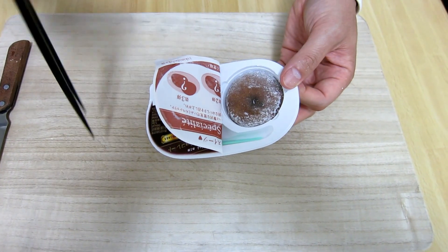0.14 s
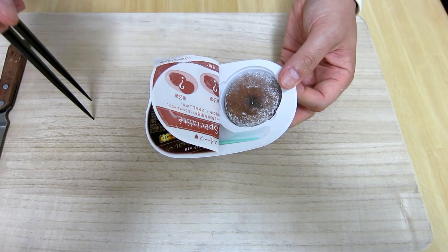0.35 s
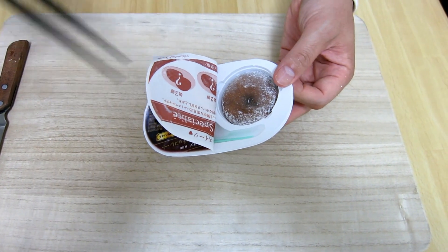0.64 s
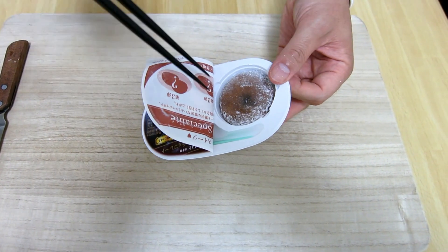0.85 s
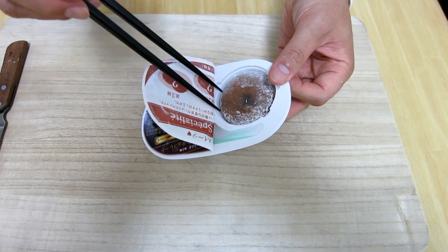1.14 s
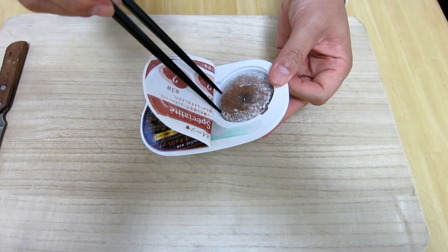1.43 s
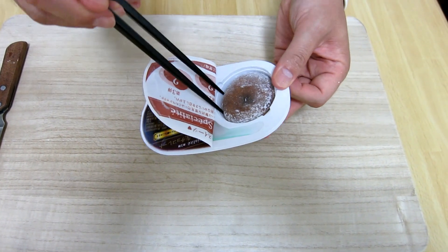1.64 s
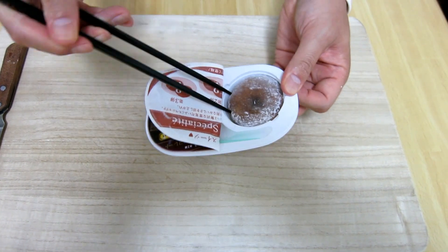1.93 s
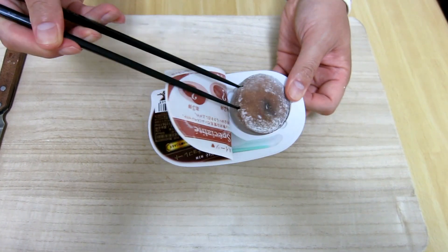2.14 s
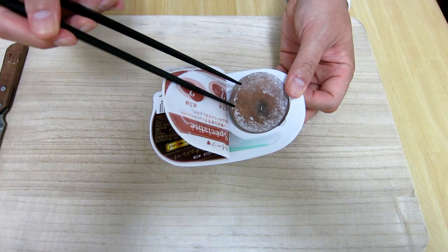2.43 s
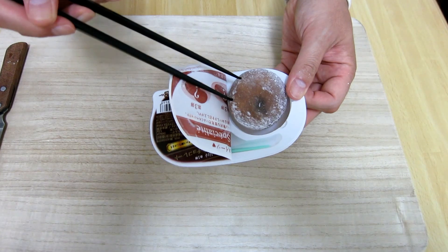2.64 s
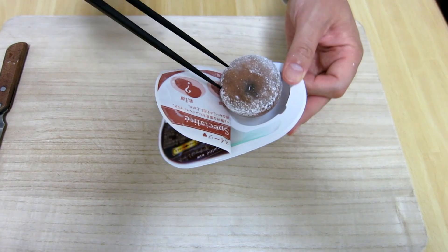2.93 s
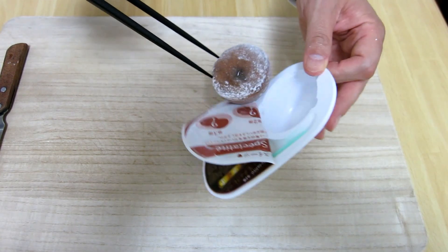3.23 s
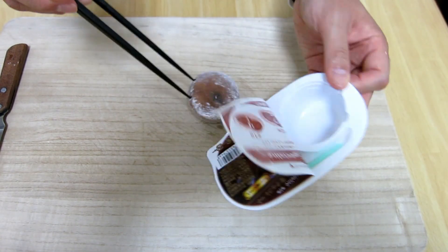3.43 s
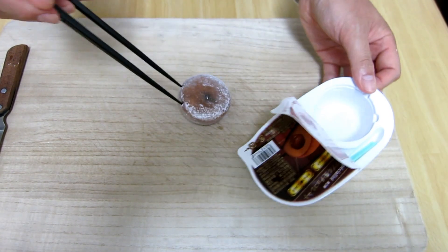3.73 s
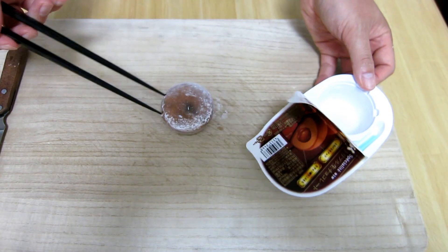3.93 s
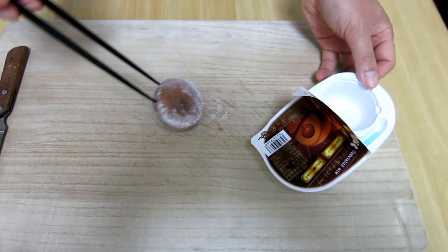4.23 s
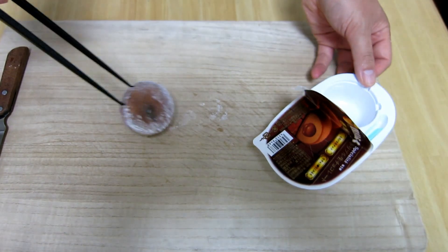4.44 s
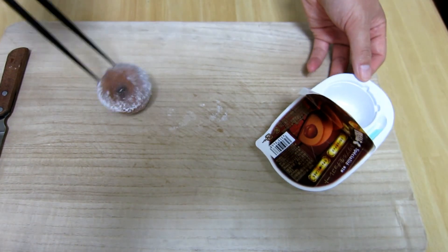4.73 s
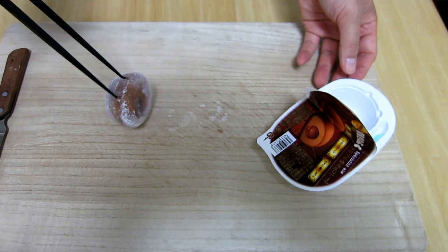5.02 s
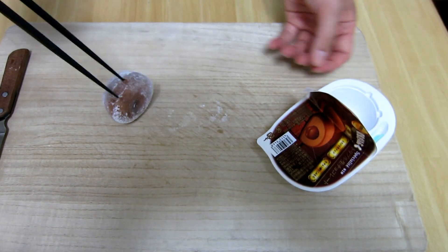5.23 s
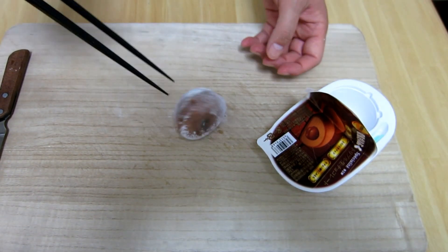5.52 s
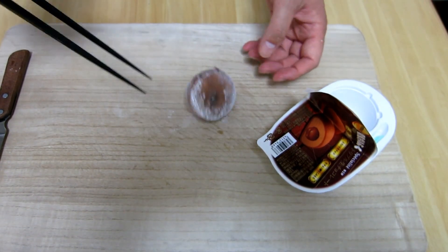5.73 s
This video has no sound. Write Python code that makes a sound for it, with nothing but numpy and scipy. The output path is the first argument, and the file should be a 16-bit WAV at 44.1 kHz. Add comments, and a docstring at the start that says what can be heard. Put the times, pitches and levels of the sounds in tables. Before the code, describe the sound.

Chopsticks clack sharply in a quiet kitchen, thin plastic crackles and pops loudly, then things bump and scrape on a wooden board.

```python
"""Chopsticks clack sharply over the hush of a kitchen, then prise a frozen sweet out of a thin plastic tray.
The sticks are tuned modes with a singing tail; things shoved on a wooden board boom as friction drives its modes.
Blows ring those same modes, scraping is coloured grit, and buckling plastic snaps as noise bursts with tray modes.
Film and tray rustle as clumped random slips. The board's boom reaches a close camera through the table."""
import sys
import numpy as np
from scipy import signal
from scipy.fft import rfft, irfft
from scipy.io import wavfile
from scipy.ndimage import uniform_filter1d

SR = 44100
rng = np.random.default_rng(int(sys.argv[2]) if len(sys.argv) > 2 else 0)


def transcribe(u):
    """Save the signal u as a 16-bit wav file named by the first command-line argument.

    u: samples, shape (n,) or (channels, n), limited to [-1, 1]; the rate is SR.
    q: integer samples, one column per channel.
    """
    v = np.clip(np.atleast_2d(u).T, -1, 1)
    q = np.round(v * 32767).astype(np.int16)
    wavfile.write(sys.argv[1], SR, q)


N = 258411

# room tone spectrum: hz, density_db (per Hz)
HUSH_SPECTRUM = [(15, -41), (25, -29.5), (59, -22.5), (141, -6.5), (190, -25), (344, -19), (405, -4),
                 (624, -16), (796, -12), (988, -12.5), (3080, -9), (3430, -11.5), (8830, -13.5),
                 (12900, -18.5), (16000, -32)]
HUSH_DB = -61
# left-right likeness of the room tone: hz, likeness (0 to 1)
HUSH_LIKENESS = [(100, 0.33), (500, 0.17), (1500, 0.16), (5000, 0.077), (14000, 0.076)]
# distant appliances: centre_hz, width_hz, level_db
APPLIANCES = [(400, 35, -67), (950, 45, -63)]

# modes of the wooden board: hz, level_db, t60_s
BOARD_MODES = [(97.5, 3.5, 0.55), (132.1, 2, 0.36), (136, 1.5, 0.36), (176.5, -4, 0.39), (191.5, 1.5, 0.36),
               (224, 2.5, 0.066), (294, -18.5, 0.12), (314.8, -17, 0.28), (450, -1.5, 0.034),
               (486.5, -31, 0.4), (632, -17.5, 0.11), (809, -25, 0.11), (943, -27.5, 0.176),
               (1464, -23.5, 0.055)]
# hands and things shoved or rocking on the board: start_s, length_s, boom_db, change_db (over the shove),
# centre_hz (of the boom), sway_db (deep table sway above the boom)
SHOVES = [(0, .11, -65, -10, 173, -25), (.415, .1, -33.5, -7.5, 236, -26),
          (.54, 0.13, -38.5, 3.5, 192, -13), (.82, 0.1, -43.5, 2, 155, -16),
          (1.09, 0.13, -37.5, -9.5, 192, -15.5), (1.37, 0.042, -50, 0, 219, -11),
          (1.57, 0.065, -46.5, 0.5, 159, -1.5), (1.77, 0.17, -51.5, -1, 180, -11),
          (2.11, 0.083, -51, 19, 222, -12), (2.2, 0.31, -31, -30, 181, -29), (2.8, .02, -65, 7.5, 198, -25),
          (2.97, 0.21, -47, -15.5, 144, 4), (3.22, .04, -65, -6, 155, 6), (3.385, 0.064, -36, -5, 144, -17),
          (3.57, .13, -32.5, -15.5, 196, -26), (3.72, .2, -40.5, 0, 154, -5.5),
          (4.035, 0.063, -32, -2.5, 171, -20), (4.135, .07, -24.5, 8, 154, -13),
          (4.205, 0.073, -21.5, -5, 145, -21), (4.3, .07, -22, -14, 152, -7),
          (4.38, 0.24, -38.5, -18, 164, 0), (4.72, 0.066, -48.5, 1, 190, -21),
          (4.878, 0.12, -29.5, -6.5, 190, -34), (5.02, .1, -45, -15, 133, -8),
          (5.25, 0.038, -39.5, 11, 151, -12), (5.31, 0.21, -39, -16.5, 151, -11),
          (5.56, .02, -53, -1, 200, -12), (5.64, 0.28, -27.5, -25, 179, -23)]
SHOVE_RISE_DB_PER_S, SHOVE_FALL_DB_PER_S = 605, 205
SHOVE_REST = (-78.5, 197, -26)  # between shoves: boom_db, centre_hz, sway_db
# spectrum of scraped wood: hz, density_db (per Hz)
SCRAPE_SPECTRUM = [(250, 4.5), (400, 0.5), (700, 1.5), (1400, -3.5), (2500, -11.5), (3500, -16),
                   (5000, -22.5), (9000, -38)]
# things scraping over the wood: start_s, length_s, level_db, change_db (over the scrape), brightness_db_per_octave
SCRAPES = [(0, 0.094, -31.5, -13.5, 0.2), (.1, 0.3, -51.5, -13, -2), (.384, 0.19, -41, -16, -2),
           (.8, 0.2, -51.5, 6, 0.9), (1.14, 0.24, -44.5, -8, -2), (1.35, 0.76, -49, 6.5, -0.2),
           (2.1, 0.089, -46, 10, -0.5), (2.2, 0.32, -40, -21, -3), (2.825, 0.025, -49, -7, -0.7),
           (2.93, 0.6, -64.5, 10, -6), (3.52, 0.53, -48.5, -11, -2.5), (3.95, 0.26, -44, -5, -0.2),
           (4.14, .1, -48, 0, -9.3), (4.24, 0.58, -46, -3.5, -1.2), (4.855, 0.044, -26, -2.5, 0.24),
           (4.91, 0.34, -35, -14, -0.25), (5.25, 0.58, -44, -11.5, -0.1), (5.6, 0.3, -42, -16, -1.3)]
SCRAPE_RISE_DB_PER_S, SCRAPE_FALL_DB_PER_S = 1793, 240
SCRAPE_REST = (-53.5, 0.1)  # between scrapes: level_db, brightness_db_per_octave

# chopsticks meeting: start_s, level_db
CLACKS = [(.008, -20), (0.023, -28), (0.0661, -15), (.528, -51)]
# bending modes of the chopsticks: hz, level_db, t60_s
STICK_MODES = [(1020, -6, .035), (1900, -14, .03), (3250, -4, .03), (4920, 2, .035), (5200, -5, .03),
               (6885, -1, .04), (8845, -4, .035), (9146, -5, .035), (11430, -6, .035), (13300, -13, .03)]
AFTER_RING_DB, AFTER_RING_LENGTH = -18, 10.2  # the free sticks sing on, softer and this many times longer

# blows on the board: start_s, level_db, deep_db, upper_db, high_db (shares of the deepest, upper and highest modes),
# ring_length (factor), rap_db (woody rap), tick_db
KNOCKS = [(0.3807, -16, -21, 25, 20.5, 0.45, -28.5, -36), (0.4333, -23, -8, -12, 29, 0.79, -43, -44.5),
          (0.465, -31, -8, -5, 46, 0.66, -55, -61), (2.1652, -5.5, -9, 11, 1.5, 0.58, -17, -46),
          (3.508, -9, -12.5, 13.5, -4, 0.8, -28.5, -41), (4.009, -27.5, 4, 38, 0, 1, -46, -52),
          (4.979, -16, 3.5, 5, -6, 0.79, -44, -29.5), (5.269, -16, -5, -8, -29, 0.94, -42, -50),
          (5.6004, -3, -8, 4.5, -0.5, 0.64, -24.5, -33)]

# plastic buckling: start_s, ring_db (tray ring), centre_hz (of the ring), crack_db, pan_db (left over right, ring)
SNAPS = [(1.1567, -28, 1220, -23, -1), (1.1656, -56, 1140, -27, 0), (1.3114, -47.5, 935, -33.5, -22),
         (1.427, -61, 2430, -34, 0), (1.4444, -38, 970, -46, -21), (1.4624, -47, 826, -42, 0),
         (1.486, -40, 1150, -38, 1), (1.5, -40, 1190, -26, -6), (1.5703, -32.5, 1010, -45, -24.5),
         (1.6093, -53, 1340, -24.5, -4), (1.6403, -49, 851, -45, -18), (1.6866, -43, 910, -55, -28),
         (1.8726, -38, 1450, -31.5, -11), (1.9183, -52, 1040, -28, -15), (1.9365, -23, 1640, -29, 1),
         (1.954, -37, 1540, -29, -10), (2.0423, -34, 1480, -45, -1), (2.0702, -26, 1190, -41, -19),
         (2.1004, -29, 3470, -20, -1), (2.1138, -16.5, 786, -8, -1), (2.141, -16.5, 1780, -20, -1),
         (2.1571, -23, 2090, -33, -2), (2.1645, -21, 760, -30, 0), (2.1771, -13.5, 1800, -13, 2),
         (2.185, -12.5, 1430, -10, -3), (2.1956, 2, 2820, 7, 7.5), (2.2221, -22, 1340, -8, -3),
         (2.2452, -23, 1320, -22, -3), (2.3994, -53, 1410, -38, -4), (2.4725, -48, 2050, -27.5, 4),
         (2.482, -38, 2810, -30, 0), (2.5731, -40, 1010, -60, -22.5), (2.8137, -47, 972, -55, -23),
         (3.1626, -36.5, 1290, -51, -2), (3.4637, -32, 1230, -22, 0), (3.572, -36, 2700, -47, -5),
         (3.5887, -30, 1690, -28.5, -4), (3.6471, -29.5, 1390, -22, -3), (3.6654, -54, 1730, -44, -7),
         (3.676, -46, 1410, -31, -5), (4.155, -36, 2700, -38, 4), (4.3797, -31, 1660, -30.5, -3),
         (4.8555, -31, 870, -44, 2), (4.9356, -38, 1180, -31, 0), (5.5243, -29, 1260, -41, -13.5)]
# modes of the plastic tray: hz, level_db, t60_s
TRAY_MODES = [(807, 3.5, 0.053), (1127, 2.5, 0.061), (1309, 8.5, 0.017), (1410, 6, 0.025), (1950, 9, 0.011),
              (1793, -2, 0.044), (2296, 21, 0.0034), (2605, 9, 0.023)]
CRACK_LOW_HZ, CRACK_OCTAVES, CRACK_TOP_HZ = (2580, 5550), 1.7, 9800  # each small crack takes its own band
BIG_BUCKLE_DB, BIG_REACH_OCTAVES = (-24, -19), 1.33  # from this ring level to that, cracks reach further down
CRACK_LIKENESS, CRACK_PAN_DB = 0.53, 3.5  # between left and right

# spectrum of rustling film: hz, density_db (per Hz)
FILM_SPECTRUM = [(500, -60), (1500, -26), (2500, -11), (3900, -3), (5200, -5), (6400, -5), (7800, -2),
                 (9000, -4), (10500, -4), (13000, -12), (16000, -33)]
# strokes of fingers and sticks on film and tray: start_s, length_s, level_db, change_db (over the stroke),
# low_voice_db (share of the tray's lower voice), centre_hz (of the hiss)
RUSTLES = [(1.16, 0.12, -46.5, -2, 3, 5800), (1.31, 0.05, -56, 8.5, 3, 6500),
           (1.424, 0.19, -41.5, -8.5, -3.5, 9300), (1.56, 0.03, -52.5, 5.5, 15, 7500),
           (1.604, 0.08, -41, -1, -6, 8900), (1.72, 0.093, -44.5, -3.5, 4, 6460),
           (1.83, 0.057, -44, -5, 9, 3800), (1.93, 0.067, -43, -1, 1.5, 8800),
           (2.01, 0.041, -43.5, 5.5, 5.5, 3500), (2.07, .04, -40, 6.5, -8, 6500),
           (2.114, 0.074, -28, -9, 3, 6260), (2.2, 0.061, -21, -14, 12, 5740),
           (2.25, 0.22, -41, -23.5, 18.5, 5070), (2.43, .035, -51, 0, 1, 7800),
           (2.484, 0.0074, -42, -13, -1, 7000), (2.612, 0.038, -54.5, -7, -24, 7200),
           (2.815, 0.072, -44.5, -7, -1, 5650), (2.99, 0.033, -53.5, -11, 7, 4900),
           (3.16, 0.049, -35.5, -3, -1.5, 6770), (3.24, 0.09, -41.5, 7, -2, 7100),
           (3.325, 0.062, -32.5, 0, -8.5, 6700), (3.41, 0.023, -30.5, -1.5, -0.5, 4970),
           (3.46, 0.0053, -26, -8.3, -3.5, 7200), (3.51, .04, -52, -7, 14, 5500),
           (3.588, 0.025, -46, -7, -7, 5300), (3.64, 0.032, -42, -1, 7.5, 5230),
           (3.81, 0.15, -53, 1.5, -0.5, 8100), (4.005, 0.12, -47.5, 2, 8, 6540),
           (4.154, 0.079, -40.5, -4.5, 12.5, 3880), (4.255, 0.057, -45, -2.5, 8.5, 5800),
           (4.36, 0.2, -47, -7, 7, 6800), (4.56, 0.038, -43.5, -11, 3.5, 6900),
           (4.686, 0.051, -41, -6, -5, 5160), (4.76, 0.095, -41.5, -3, -1, 6900),
           (4.88, 0.17, -49, -13, 24, 4640), (5.268, 0.23, -51, -20.5, 12, 4400),
           (5.54, 0.076, -56, 2.5, 7, 4970)]
RUSTLE_RISE_DB_PER_S, RUSTLE_FALL_DB_PER_S, RUSTLE_PAN_DB = 699.5, 367, 0.5
RUSTLE_REST = (-63, 3.4, 5900)  # between strokes: level_db, low_voice_db, centre_hz
# hollow of the emptied tray: hz, boost_db
CUP_RESONANCES = [(1400, 3), (3900, 6), (7700, 1)]
CUP_RUBBED_S, CUP_WIDTH_OCTAVES = (3.27, 3.49), 0.15
CLUMP_DB, CLUMP_S = 1.5, .008  # slips come in clumps

# decay of the room: hz, t60_s
KITCHEN_DECAY = [(200, .3), (1000, .42), (5000, .45), (12000, .3)]
EDGE_HZ = 16100  # upper limit of the sound


def gain_of(db):
    """Decibels to a factor."""
    return 10 ** (np.asarray(db) / 20)


def evened(x):
    """Scales to rms 1."""
    return x / np.sqrt(np.mean(x ** 2) + 1e-20)


def read(points, hz):
    """Reads a table on a log-frequency axis."""
    f, value = np.transpose(points)
    return np.interp(np.log(hz + 1), np.log(f + 1), value)


def strokes(rows, rest, rise_db_per_s, fall_db_per_s):
    """Each stroke rises, slides evenly in level and falls; powers add and the louder one sets the colour."""
    t = np.arange(0, N / SR + .002, .001)
    start, length, db, change_db, *colours = np.transpose(rows)[:, :, None]
    db = db + change_db * np.clip((t - start) / length, 0, 1)
    db = db - rise_db_per_s * np.maximum(start - t, 0)
    db = db - fall_db_per_s * np.maximum(t - start - length, 0)
    power = gain_of(db) ** 2
    rest_power = gain_of(rest[0]) ** 2
    total = power.sum(0) + rest_power
    blends = [((power * c).sum(0) + rest_power * r) / total for c, r in zip(colours, rest[1:])]
    return np.transpose([t, 10 * np.log10(total), *blends])


def follow(curve, t):
    """Reads every column of a curve at times t."""
    s, *columns = np.transpose(curve)
    return [np.interp(t, s, c) for c in columns]


def add(mix, s, sound):
    """Mixes a sound in from time s."""
    part = mix[..., round(s * SR):][..., :sound.shape[-1]]
    part += sound[..., :part.shape[-1]]


def sides(pan_db):
    """Left and right gains, one per row, for a level difference."""
    return gain_of([[pan_db / 2], [-pan_db / 2]])


def partly_alike(left, other, same):
    """Two channels, the right one sharing part of the left."""
    return np.array([left, same * left + np.sqrt(1 - same ** 2) * other])


def ring(modes, extra_db, seconds, spread, contact_s):
    """Dying sines, a little detuned at each blow and softened by the length of contact, peak 1."""
    hz, db, t60 = np.transpose(modes)[:, :, None]
    t = np.arange(round(seconds * SR)) / SR
    hz = hz * (1 + spread * rng.standard_normal(hz.shape))
    decay = gain_of(db + extra_db - 60 * t / t60)
    out = (decay * np.sin(2 * np.pi * hz * t)).sum(0)
    out = out * np.sin(np.pi / 2 * np.minimum(t / contact_s, 1)) ** 2
    return out / np.abs(out).max()


def crack(low_hz, high_hz, t60):
    """A dying burst of band-limited noise a few milliseconds long, peak 1."""
    t = np.arange(1200) / SR
    burst = rng.standard_normal(1200) * gain_of(-60 * t / t60)
    band = signal.butter(2, [low_hz, high_hz], "band", fs=SR, output="sos")
    out = signal.sosfilt(band, burst)
    return out / np.abs(out).max()


def grit(per_s, spread_db, same):
    """Dense random slips of uneven size, two partly alike channels."""
    size = gain_of(spread_db * np.minimum(rng.exponential(1, N), 4))
    size = size * (rng.random(N) < per_s / SR)
    left, other = rng.standard_normal((2, N))
    return evened(size * partly_alike(left, other, same))


def colour(x, field_db, patchy_db, size):
    """Multiplies short-time spectra by a field of dB plus drifting patches."""
    overlap = size * 3 // 4
    hz, t, z = signal.stft(x, SR, nperseg=size, noverlap=overlap)
    patches = rng.standard_normal((len(t), len(hz))).T
    patches = uniform_filter1d(patches, size=4, axis=0)  # across frequency
    patches = evened(uniform_filter1d(patches, size=28, axis=1))  # across time
    z = z * gain_of(field_db(hz[:, None], t) + patchy_db * patches)
    return signal.istft(z, SR, nperseg=size, noverlap=overlap)[1][:, :N]


def resonate(x, hz, width):
    """A fixed resonance of gain 1."""
    r = np.exp(-np.pi * width / SR)
    return 2 * signal.lfilter([1 - r], [1, -r * np.exp(2j * np.pi * hz / SR)], x).real


def hush():
    """Room tone as shaped noise, wider towards the treble, with two faint drones of resonated noise."""
    hz = np.fft.rfftfreq(N, 1 / SR)
    left, other = rfft(rng.standard_normal((2, N)))
    spectra = partly_alike(left, other, read(HUSH_LIKENESS, hz)) * gain_of(read(HUSH_SPECTRUM, hz))
    drones = np.zeros(N)
    for centre_hz, width_hz, db in APPLIANCES:
        drone = resonate(rng.standard_normal(N), centre_hz, width_hz)
        drones += gain_of(db) * evened(resonate(drone, centre_hz, width_hz))
    return gain_of(HUSH_DB) * evened(irfft(spectra, N)) + drones


def drag():
    """Friction drives the board's modes, sways the table and scrapes the wood."""
    t = np.arange(N) / SR
    shoves = strokes(SHOVES, SHOVE_REST, SHOVE_RISE_DB_PER_S, SHOVE_FALL_DB_PER_S)
    boom_db, centre_hz, sway_db = follow(shoves, t)
    friction, boom = rng.standard_normal(N), np.zeros(N)
    for hz, db, t60 in BOARD_MODES[:9]:
        width = 7 / t60 + 15  # the load damps each mode
        near = gain_of(0.1 * db - 59 * np.log2(hz / centre_hz) ** 2)
        mode = resonate(resonate(friction, hz, width), hz, 3 * width)
        boom = boom + near * evened(mode)
    boom = boom / np.sqrt(uniform_filter1d(boom ** 2, size=6000))  # the hand's pressure alone sets the level
    sway = resonate(resonate(rng.standard_normal(N), 46.0, 34.7), 72, 45)
    table = gain_of(boom_db) * (boom + gain_of(sway_db) * evened(sway))

    scrapes = strokes(SCRAPES, SCRAPE_REST, SCRAPE_RISE_DB_PER_S, SCRAPE_FALL_DB_PER_S)

    def field_db(hz, t):
        """Wood colour, tilted about roughly 700 Hz by each scrape's brightness."""
        return read(SCRAPE_SPECTRUM, hz) + follow(scrapes, t)[1] * np.log2(hz / 700 + 0.043)

    slips = grit(per_s=2700, spread_db=-1.0, same=0.067)
    scrape = colour(slips, field_db, patchy_db=0.0, size=512)
    return table + gain_of(follow(scrapes, t)[0]) * evened(scrape)


def chopsticks():
    """A sharp tick, then the bending modes of the sticks, which sing on quietly."""
    out = np.zeros(N)
    # four detuned copies of every mode make up the singing
    singing_modes = np.tile(STICK_MODES, (4, 1)) * [1, 1, AFTER_RING_LENGTH]
    for s, db in CLACKS:
        add(out, s, gain_of(db) * ring(STICK_MODES, 0, .3, spread=0.006, contact_s=0.00048))
        singing = ring(singing_modes, 0, .4, spread=0.016, contact_s=0.0064)
        add(out, s, gain_of(db + AFTER_RING_DB) * singing)
        add(out, s, gain_of(db - 1.5) * crack(low_hz=1950, high_hz=11900, t60=0.018))
    return out * sides(3.)


def knocks():
    """A soft push excites the board's modes, by where and how hard it lands and how it rests there."""
    out, hz = np.zeros(N), np.transpose(BOARD_MODES)[0][:, None]
    for s, db, deep_db, upper_db, high_db, length, rap_db, tick_db in KNOCKS:
        reach_db = deep_db * (hz < 165) + upper_db * ((hz > 270) & (hz < 430)) + high_db * (hz > 430)
        modes = np.multiply(BOARD_MODES, [1, 1, length])
        add(out, s, gain_of(db) * ring(modes, reach_db, .6, spread=0.026, contact_s=0.0031))
        add(out, s, gain_of(rap_db) * crack(low_hz=634, high_hz=2100, t60=0.013))
        add(out, s, gain_of(tick_db) * crack(low_hz=3000, high_hz=10200, t60=0.011))
    return out


def snaps():
    """Each buckle cracks and rings the tray modes nearest to where it bends."""
    out, hz = np.zeros((2, N)), np.transpose(TRAY_MODES)[0][:, None]
    lowest_hz, highest_hz = CRACK_LOW_HZ
    lows_hz = lowest_hz * (highest_hz / lowest_hz) ** rng.random(len(SNAPS))
    for (s, db, centre_hz, crack_db, pan_db), low_hz in zip(SNAPS, lows_hz):
        near_db = -9 * np.log2(hz / centre_hz) ** 2
        tone = ring(TRAY_MODES, near_db, .08, spread=0.069, contact_s=0.00061)
        add(out, s, gain_of(db) * tone * sides(pan_db))
        high_hz = min(low_hz * 2 ** CRACK_OCTAVES, CRACK_TOP_HZ)
        low_hz = low_hz / 2 ** np.interp(db, BIG_BUCKLE_DB, [0, BIG_REACH_OCTAVES])
        left, other = [crack(low_hz, high_hz, t60=0.0079) for _ in range(2)]
        pair = partly_alike(left, other, CRACK_LIKENESS)
        add(out, s, gain_of(crack_db) * pair * sides(CRACK_PAN_DB))
    return out


def rustle():
    """Slips of film and tray; the bright centre moves from stroke to stroke as the sheet bends."""
    hands = strokes(RUSTLES, RUSTLE_REST, RUSTLE_RISE_DB_PER_S, RUSTLE_FALL_DB_PER_S)

    def field_db(hz, t):
        """Film colour, a moving hump and the tray's lower voice, which thins out fast below its modes."""
        _, low_voice_db, centre_hz = follow(hands, t)
        hump_db = 5 * np.exp(-(np.log2((hz + 1) / centre_hz) / .6) ** 2)
        film = gain_of(read(FILM_SPECTRUM, hz) + hump_db)
        octaves = np.log2((hz + 1) / 1400)
        tray = gain_of(low_voice_db - np.where(octaves < 0, 30, 7) * octaves ** 2)
        cup_db = sum(db * np.exp(-(np.log2((hz + 1) / f) / CUP_WIDTH_OCTAVES) ** 2)
                     for f, db in CUP_RESONANCES)
        cup_rubbed = (t > CUP_RUBBED_S[0]) & (t < CUP_RUBBED_S[1])
        return 20 * np.log10(film + tray + 1e-9) + cup_db * cup_rubbed

    t = np.arange(N) / SR
    touching = t > RUSTLES[0][0]  # silent until the first stroke
    clumps = evened(uniform_filter1d(rng.standard_normal(N), size=round(CLUMP_S * SR)))
    slips = grit(per_s=12000, spread_db=0.5, same=0.82) * gain_of(CLUMP_DB * clumps)
    sheet = colour(slips, field_db, patchy_db=2.2, size=256)
    return gain_of(follow(hands, t)[0]) * touching * sheet * sides(RUSTLE_PAN_DB)


def kitchen(x):
    """Sparse reflections of random sign, each band dying at its own speed."""
    taps = np.zeros((2, SR // 2))
    at = np.arange(160, SR // 2 - 20, 20)
    at = at + rng.integers(0, 20, (2, len(at)))  # one reflection somewhere in every 20 samples
    np.put_along_axis(taps, at, rng.choice([-1., 1.], at.shape), axis=1)
    hz, t, z = signal.stft(taps, SR, nperseg=256)
    decay = gain_of(-60 * t / read(KITCHEN_DECAY, hz)[:, None])
    tail = signal.istft(z * decay, SR, nperseg=256)[1]
    return signal.fftconvolve(x, tail / np.linalg.norm(tail[0]), axes=1)[:, :N]


def scene():
    """Airborne sounds fill the room; the board's boom arrives through the table, alike on both sides."""
    sticks, plastic = chopsticks(), snaps() + rustle()
    # the board is too small for its blows to carry anything below its first mode
    board_cut = signal.butter(3, 80, "high", fs=SR, output="sos")
    wood = signal.sosfilt(board_cut, knocks()) + drag()
    room = kitchen(gain_of(-7.5) * sticks + gain_of(-21.0) * plastic)
    wood_room = gain_of(-11) * kitchen(wood).mean(0)
    return sticks + plastic + wood + room + wood_room + hush()


def record(dry):
    """The microphone drops the deepest bass, a limiter ducks after loud peaks; then the band limit."""
    heard = signal.sosfilt(signal.butter(3, 42, "high", fs=SR, output="sos"), dry)
    peak_db = 20 * np.log10(np.abs(heard).max(0) + 1e-9)
    fall = np.arange(N) * 30. / SR  # recovers 30 dB a second
    held_db = np.maximum.accumulate(peak_db + fall) - fall
    over_db = np.maximum(held_db + 1, 0)  # above -1 dB
    duck_db = uniform_filter1d(over_db, size=40, origin=19)  # ducking eases in over 40 samples
    ducked = np.clip(heard / gain_of(duck_db), -.9, .9)
    band_limit = signal.firwin(511, EDGE_HZ, window=("kaiser", 9), fs=SR)
    return signal.oaconvolve(ducked, band_limit[None], "same")


dry = scene()
out = record(dry)
transcribe(out)
```